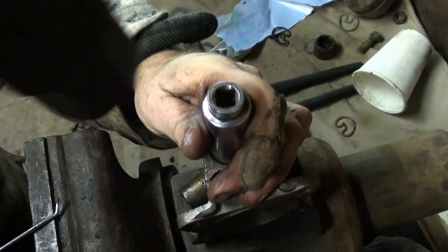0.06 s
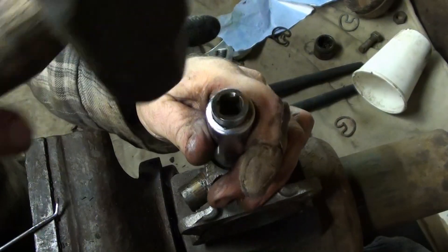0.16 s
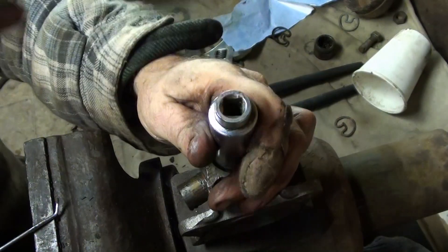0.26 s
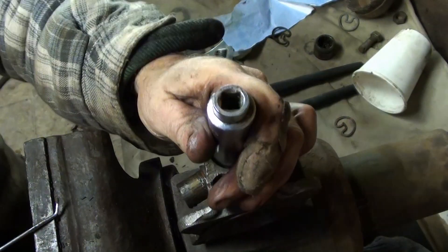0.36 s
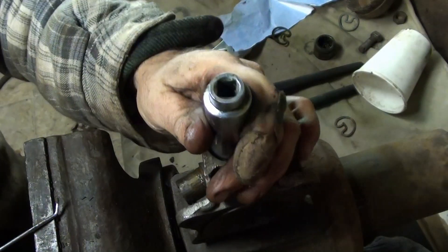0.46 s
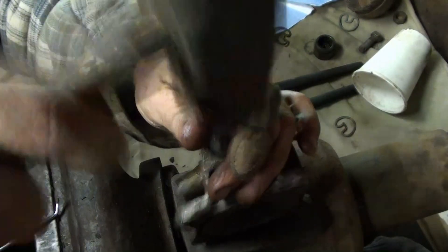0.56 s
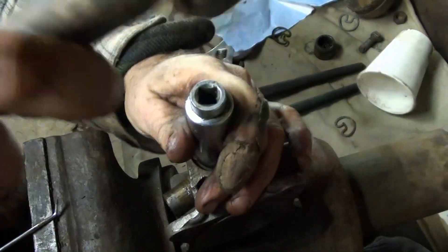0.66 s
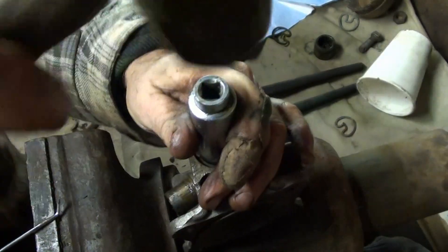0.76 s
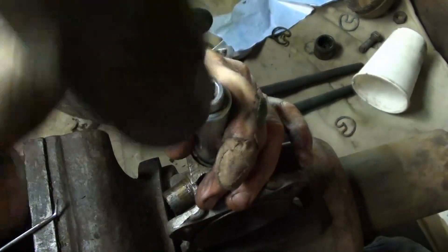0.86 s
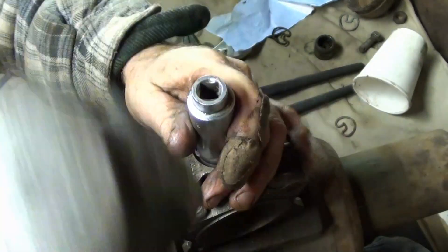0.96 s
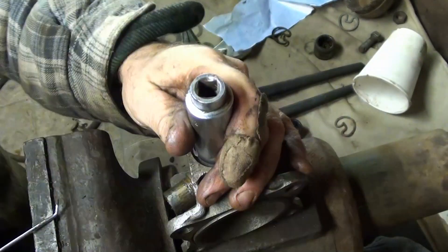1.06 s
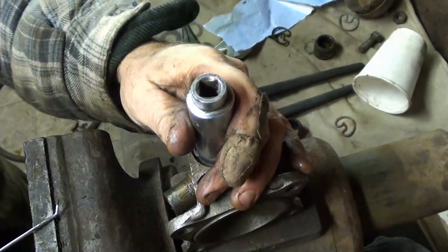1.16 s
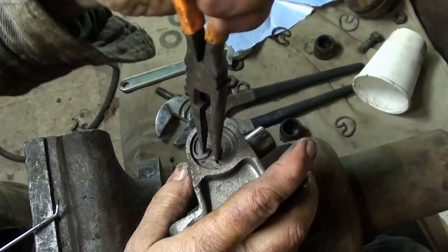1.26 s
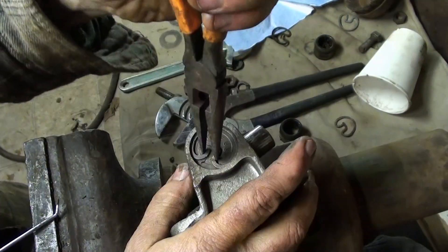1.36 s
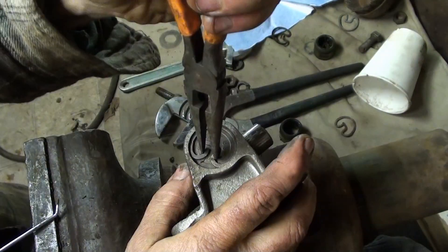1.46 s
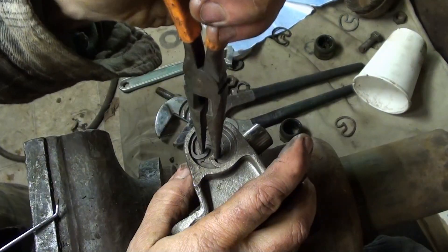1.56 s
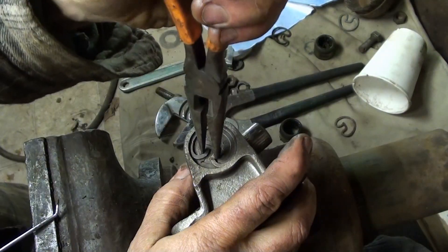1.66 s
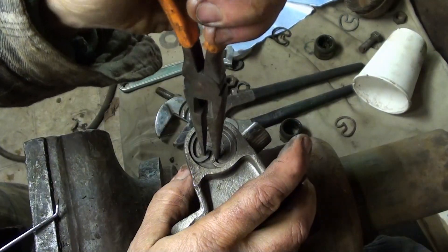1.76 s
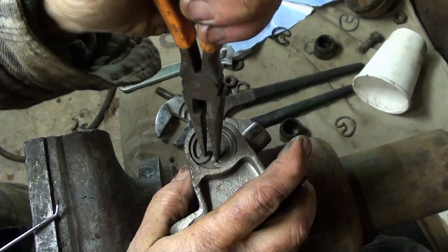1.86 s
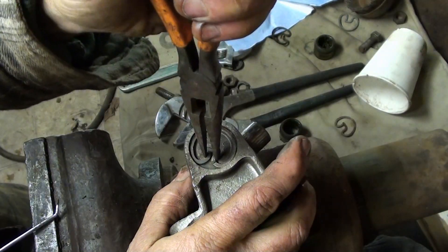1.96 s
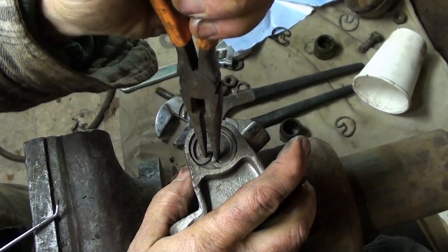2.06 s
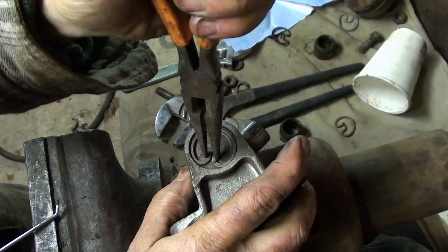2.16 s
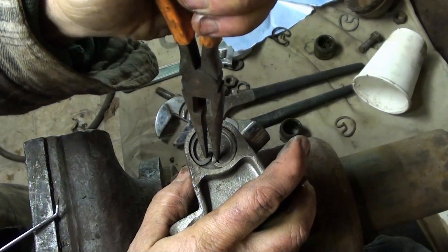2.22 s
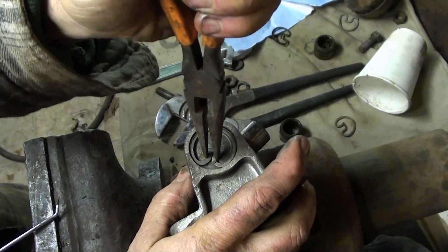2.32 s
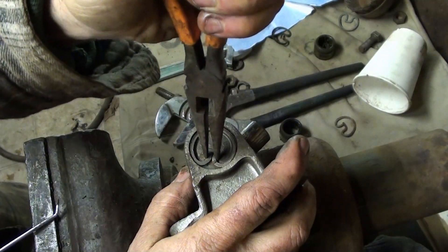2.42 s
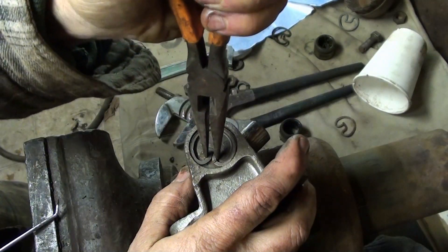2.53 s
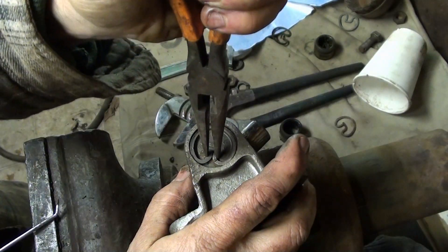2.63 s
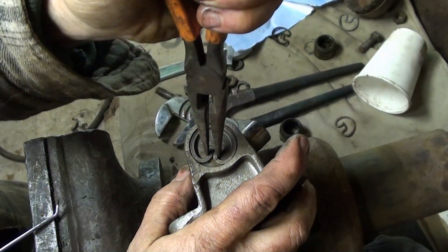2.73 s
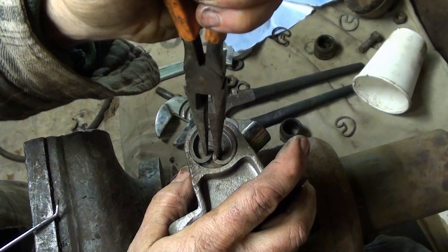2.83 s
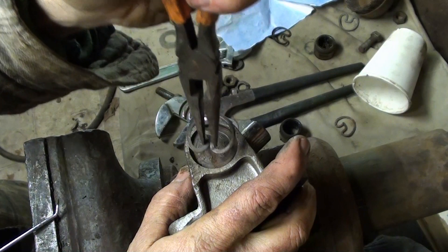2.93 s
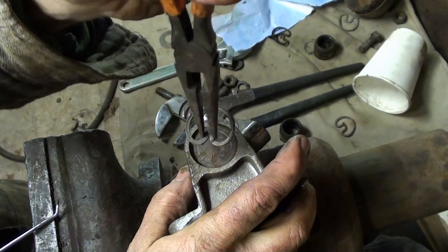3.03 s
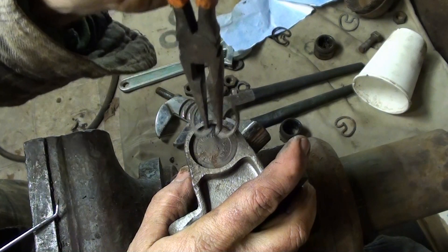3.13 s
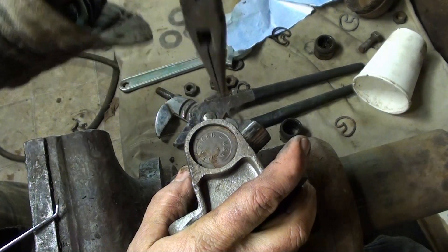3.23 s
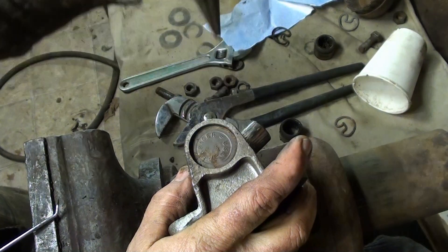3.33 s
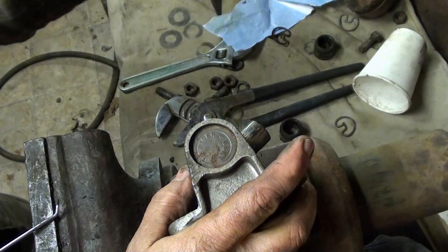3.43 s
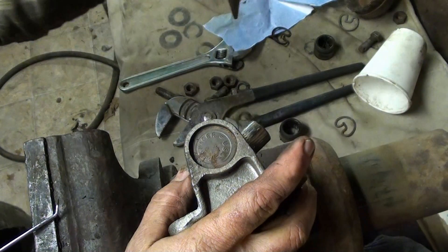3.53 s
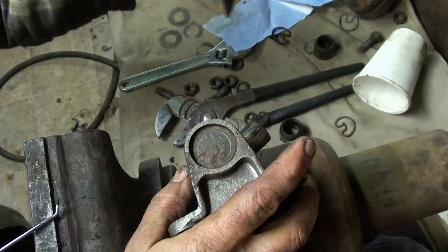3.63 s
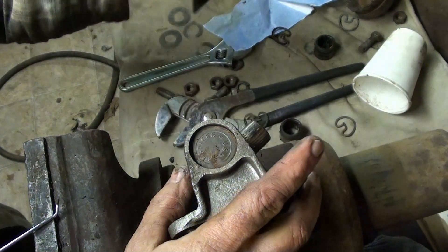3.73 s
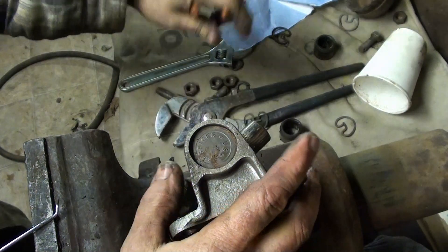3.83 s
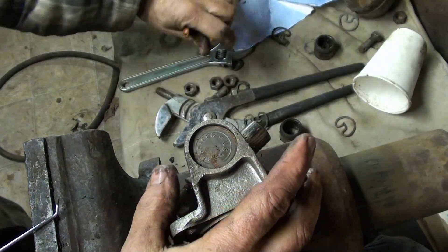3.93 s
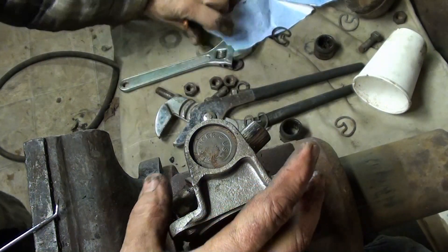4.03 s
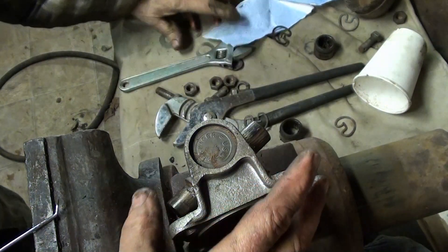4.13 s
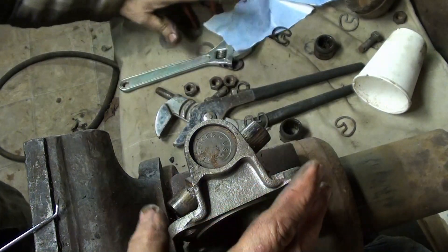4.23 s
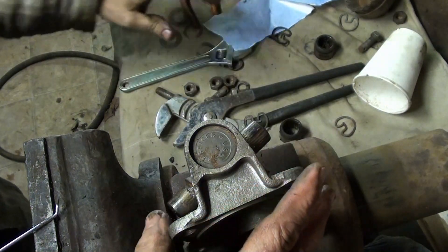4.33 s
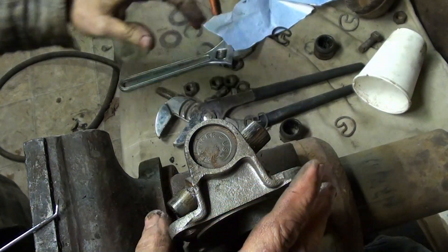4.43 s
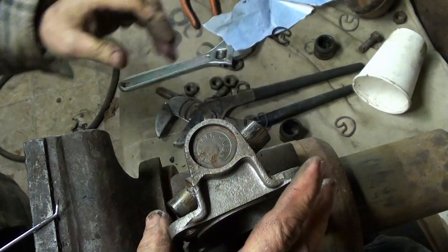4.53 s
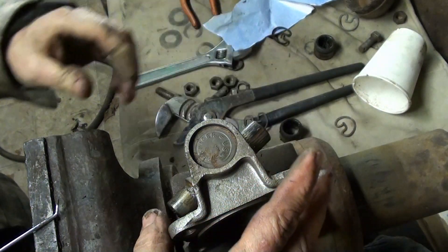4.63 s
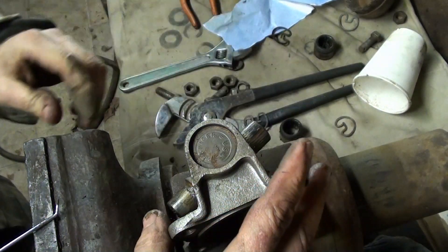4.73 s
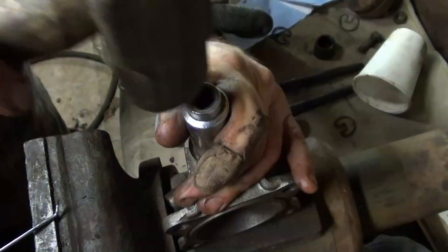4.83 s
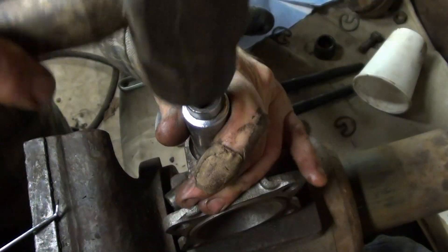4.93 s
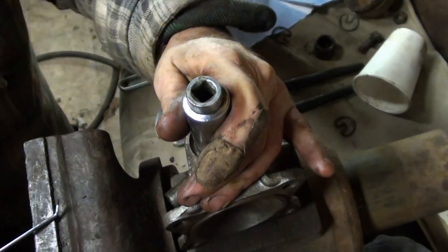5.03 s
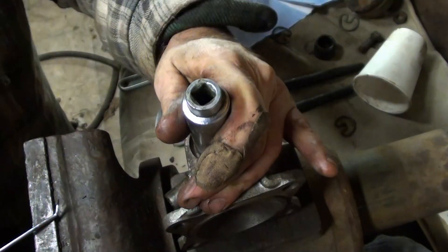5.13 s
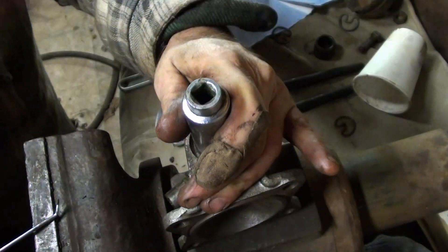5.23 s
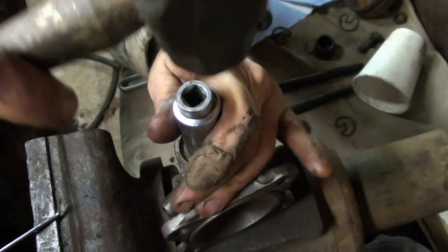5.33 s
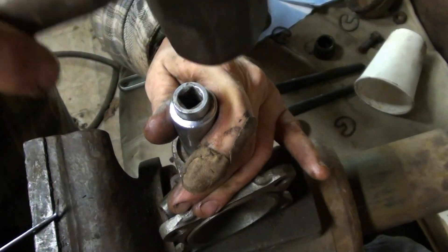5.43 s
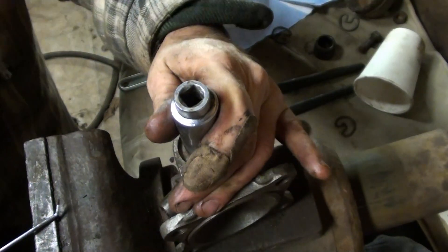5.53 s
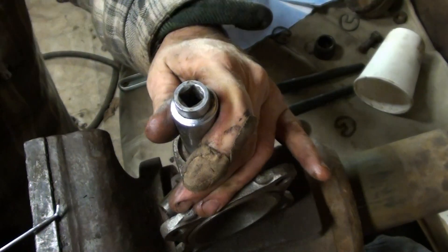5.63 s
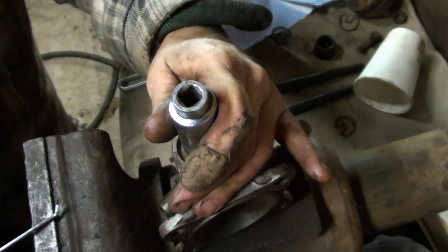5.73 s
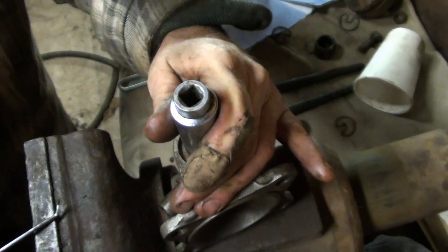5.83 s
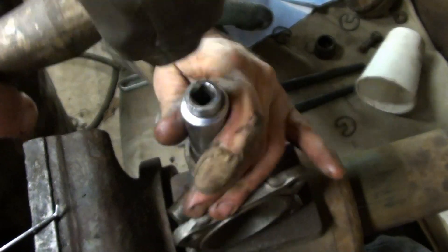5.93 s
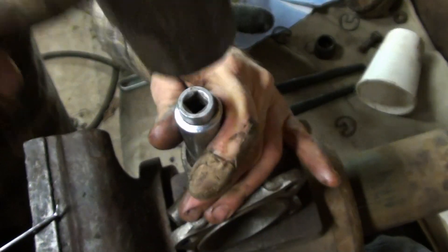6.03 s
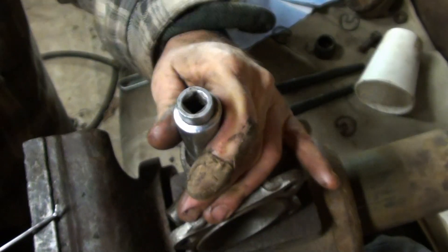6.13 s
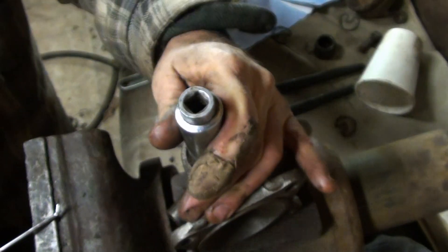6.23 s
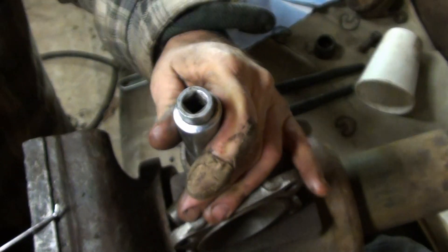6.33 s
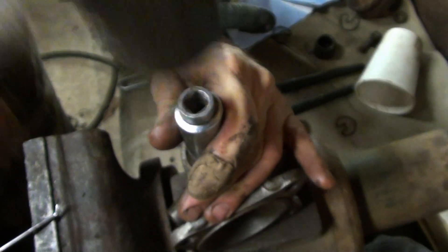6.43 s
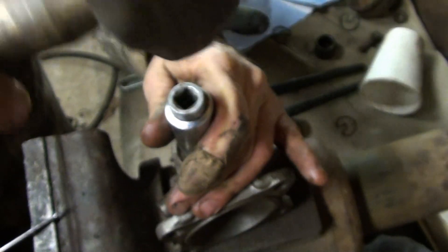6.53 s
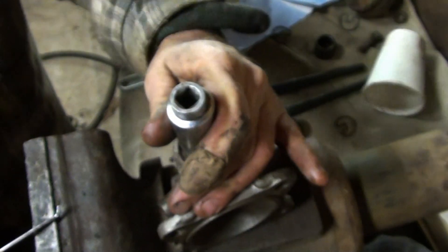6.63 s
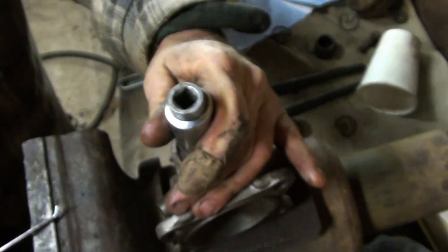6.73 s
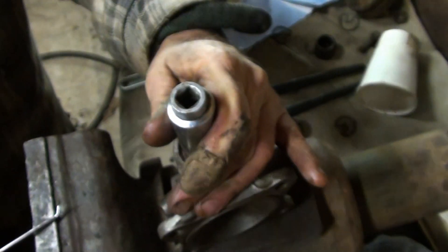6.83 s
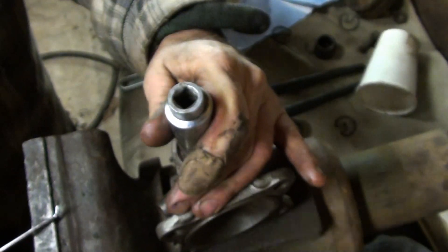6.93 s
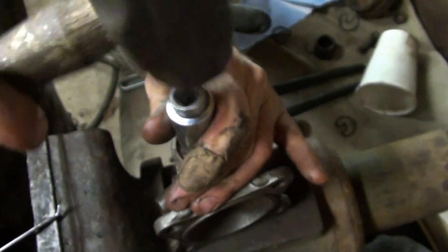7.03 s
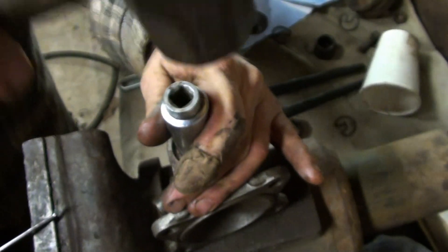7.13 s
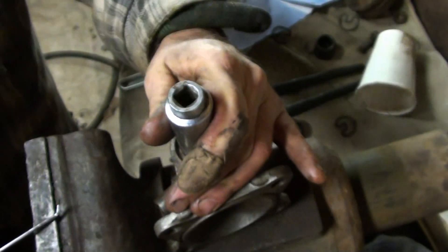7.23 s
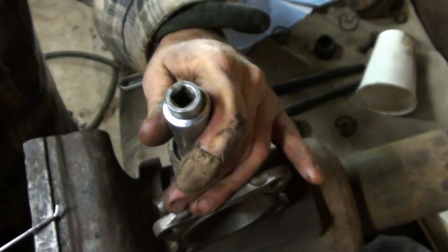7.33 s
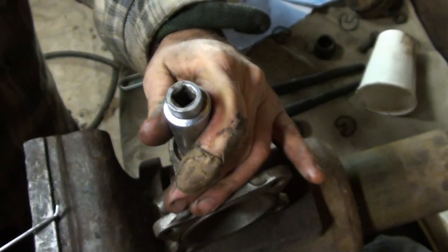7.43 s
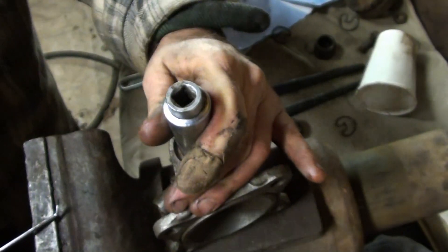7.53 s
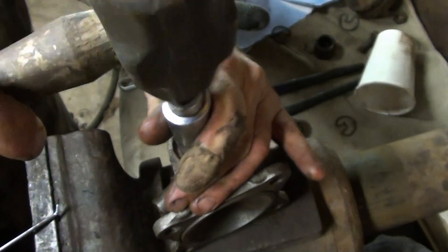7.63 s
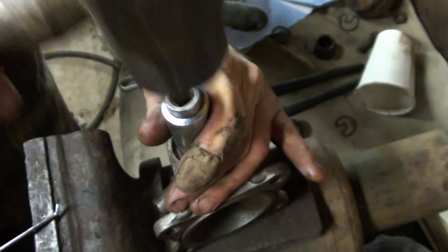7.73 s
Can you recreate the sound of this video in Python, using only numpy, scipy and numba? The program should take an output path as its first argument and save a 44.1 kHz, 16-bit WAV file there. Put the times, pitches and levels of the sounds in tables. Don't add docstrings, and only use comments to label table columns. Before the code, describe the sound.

Steel struck by a hammer at arm's length: a single loud clank, abruptly ended, then soft hand bumps and a small click. A light metal ring lands and bounces with bright tinkles, and pliers land in a quick cluster of clacks. Then five regular blows, roughly two every second, grow brighter and ring higher. Dry, faint room echo, steady hiss, distant bird chirps.

```python
import sys
import numpy as np
from scipy import signal
from scipy.fft import rfft, irfft
from scipy.io import wavfile
from scipy.ndimage import uniform_filter1d
from numba import njit

SR = 44100
rng = np.random.default_rng(int(sys.argv[2]) if len(sys.argv) > 2 else 0)


def waveform_to_disk(signal):
    frames = np.transpose(np.atleast_2d(signal))
    scaled = np.clip(frames, -1, 1) * 32767
    samples = np.round(scaled).astype(np.int16)
    wavfile.write(sys.argv[1], SR, samples)


def boost(x):
    u = np.asarray(x, float) / 20
    return 10 ** u


N = 342657
CUT_S = 1.285


def read(table, hz):
    f, v = np.transpose(table)
    return np.interp(np.log(np.maximum(hz, 1)), np.log(f), v)


def colour(x, gain_db):
    n = x.shape[-1]
    return irfft(rfft(x) * boost(gain_db(np.arange(n // 2 + 1) * SR / n)), n)


def add(out, s, x):
    i = int(s * SR)
    out[..., i:i + x.shape[-1]] += x[..., :max(N - i, 0)]


def dense(spectrum, t60s, rise_cycles=5.3, treble_db=0.):
    # hz, level_db
    width = [(60, -29), (110, -30.5), (200, -26), (380, -21), (700, -15), (1290, -11.5), (2380, -13),
             (4400, -12), (8120, -10.5), (15000, -24)]
    n = 2 ** 16
    t, hz = np.arange(n) / SR, np.arange(n // 2 + 1) * SR / n
    treble = np.clip(np.log2(hz / 1500 + 1e-9) / 2, 0, 1)
    mid_db = read(spectrum, hz) + treble_db * treble
    mid_side_db = mid_db + np.array([0 * hz, read(width, hz)])
    noise = rfft(rng.standard_normal((2, n))) * boost(mid_side_db)
    out = np.zeros((2, n))
    for centre in 40 * 2 ** np.arange(0, 9, .5):
        octaves_off = np.log2(np.maximum(hz, 1) / centre)
        share = np.cos(np.pi * np.clip(octaves_off, -.5, .5))
        swell = 1 - np.exp(-t * centre / rise_cycles)
        decay = boost(-60 * t / read(t60s, centre))
        out += irfft(noise * share, n) * swell * decay
    mid, side = out
    return np.array([mid + side, mid - side])


def ring(modes, tilt_db=0., stretch=0.96, rough=.5, flutter_hz=60., lasts=0.56):
    hz, db, t60 = np.transpose(modes)[:, :, None]
    level_chance, phase_chance = rng.standard_normal((2, len(modes), 1))
    knots = rng.standard_normal((2, len(modes), 200))
    t = np.arange(int(lasts * SR)) / SR
    flutter = np.array([np.interp(t * flutter_hz, np.arange(200), a + 1j * b) for a, b in zip(*knots)])
    looseness = (1 + rough * flutter) / np.sqrt(1 + rough ** 2)
    db = db + 1.2 * level_chance + tilt_db * np.log2(hz / 8000) - 60 * t / (t60 * stretch)
    partials = boost(db) * np.imag(looseness * np.exp(2j * np.pi * hz * t + 1j * phase_chance))
    return partials.sum(axis=0) * np.clip((lasts - t) / 0.00063, 0, 1)


def burst(hz, octaves, length):
    t = np.arange(int(SR * (3 * length + 8 / hz))) / SR
    rise, fall = np.minimum(t / (0.056 * length), 1), np.exp(-(t / length) ** 2)
    x = rng.standard_normal(len(t)) * rise * fall
    edges = np.clip(hz * 2 ** (np.array([-.5, .5]) * max(octaves, .1)), 30, .45 * SR)
    x = signal.sosfilt(signal.butter(2, edges, "band", fs=SR, output="sos"), x)
    return x / np.sqrt(np.sum(x ** 2) / (length * SR))


def hammer():
    # start_s, strength_db, bench_thud_db, treble_db (hardness), high_socket_rings_db
    blows = [(0.688, -4.5, 1, -1, -1), (5.411, -7, -1.5, 0, 1.5), (5.985, -4.5, -3, 0, 7.5),
             (6.569, -5, 2, 3, 2.5), (7.134, -5.5, 0.5, 3.5, 6), (7.689, -9.5, 10.5, 6.5, 8)]
    # hz, t60_s
    clamp = [(35, -42), (60, -10), (380, -4.5), (1140, -8.5), (1280, -1.5), (1410, -10), (1660, -7.5),
             (1820, -5), (2190, -6.5), (3700, -9), (4300, -13), (7400, -9), (10000, -16), (14900, -32),
             (16000, -56)]
    clamp_t60 = [(80, 0.31), (250, 0.31), (700, 0.35), (2000, 0.36), (5000, 0.35), (10000, 0.27),
                 (15000, 0.17)]
    # hz, t60_s
    bench = [(50, -35), (100, -9.5), (280, -5.5), (500, -8), (1000, -7.5), (2500, -15), (5000, -42)]
    bench_t60 = [(80, 1.33), (300, 1.094), (1000, 0.65), (3000, 0.76)]
    # hz, level_db, t60_s
    yoke = [(382.4, -10, 0.63), (1266, -5, 0.4), (1316, -1, 0.2), (1562, 2.5, 0.16), (1587, -4.5, 0.33),
            (1683, 0.5, 0.36), (1953, -4.5, .3), (2100, -11, 0.15), (2240, -4, 0.4), (2746, -1.5, 0.34),
            (2970, -1.5, 0.23), (3320, -15.5, 0.22), (3420, -1, .28), (3700, -2, 0.357)]
    socket_low = [(6710, 5.5, 0.17), (6920, -2.5, 0.39), (7370, 3, 0.21), (7700, 8, 0.2),
                  (8110, -2.5, 0.18), (8200, -19.5, .17)]
    socket_high = [(9800, -17, 0.16), (9760, 7.5, 0.045), (9820, -2, 0.14), (10080, -6.5, 0.19),
                   (10700, -19.5, 0.15), (14800, -19.5, .1)]
    bench_note = [(281.7, -1.3, 1.37)]
    head_note = [(5669, 0, .37)]
    # hz, level_db, t60_s
    seatings = [
        [(1260, 3, 0.4), (2210, 0.5, .3), (7300, -2, .33)],
        [(2390, 4, 0.33), (9690, 1, 0.28), (9824, -6, .13)],
        [(6670, 1, 0.34), (14900, -8, 0.12), (9750, 6, 0.27)],
        [(9458, 10, 0.21), (15000, -4, 0.2)],
        [(7490, 7, 0.37), (7230, 2, .2), (7620, 9.5, 0.26), (14950, -2, 0.15)],
        [(6500, -6, .25), (9800, 6, 0.31), (14950, -4.5, 0.19)],
    ]
    head_levels = [-40, -28, -20, -13, -20, -19]
    socket_rattle = dict(rough=1.9, flutter_hz=150.)
    out = np.zeros((2, N))
    for (s, db, thud_db, treble_db, high_db), seating, head_db in zip(blows, seatings, head_levels):
        x = boost(7.5) * dense(clamp, clamp_t60, treble_db=treble_db)
        x += boost(-8.0 + thud_db) * dense(bench, bench_t60)
        steel = boost(-17) * ring(yoke, rough=0.67, flutter_hz=36.3)
        low_db = -19.5 + 1.95 * treble_db
        steel += boost(low_db) * ring(socket_low, **socket_rattle)
        steel += boost(-14.5 + high_db) * ring(socket_high, **socket_rattle)
        steel += boost(-17.5) * ring(seating, rough=.8, flutter_hz=60.)
        steel += boost(head_db) * ring(head_note, rough=.35, flutter_hz=25.)
        x[:, :len(steel)] += steel
        add(x, 0, boost(-36.0 + thud_db) * ring(bench_note, rough=0.45, flutter_hz=16.1, lasts=1.))
        t = np.arange(x.shape[1]) / SR
        x *= np.minimum(t / .003, 1) ** 2
        if s < CUT_S:
            x *= np.clip((CUT_S - s - t) / 0.011, 0, 1)
        add(out, s - .0015, boost(db + 5) * x)
    return out


def contacts(table, modes, crack_hz, until, **looseness):
    out = np.zeros((3, N))
    ends = [row[0] for row in table[1:]] + [until]
    for (s, db, ring_db, tilt_db, thud_db), end in zip(table, ends):
        add(out[0], s, boost(db - 4.5) * burst(crack_hz, 1.29, 0.002))
        add(out[1], s, boost(db + ring_db) * ring(modes, tilt_db, lasts=end - s, **looseness))
        add(out[2], s, boost(db + thud_db) * np.hanning(14) * 2)
    return out


def bench_work():
    # start_s, peak_db, ring_db, ring_tilt_db_per_octave, bench_thud_db
    ring_lands = [
        (3.3266, -19.5, -7, -.4, -29),
    ]
    ring_bounces = [
        (3.4705, -19.5, -5, -5, -20),
        (3.5788, -29, -2, 6, -25.5),
        (3.6454, -36, -4, -4, -23),
        (3.654, -38, -3, -11, -35),
    ]
    pliers_down = [
        (4.1835, -11.5, -4.5, 0, -4),
        (4.1914, -15, -2, -3, -11.5),
        (4.2015, -13, -9, 15, -12),
        (4.2422, -8, -6.5, -2, -6.5),
    ]
    # hz, level_db, t60_s
    ring_flat = [(1137, -26, 0.61), (2090, -7.5, 0.15), (2270, -12, 0.18), (4150, -3, 0.086),
                 (4420, -6, 0.15), (5000, -11, 0.17), (6630, -3.5, 0.16), (6970, -2.5, 0.12),
                 (7170, -5, 0.16), (8050, -12, .12), (8070, -9, .12), (8640, -14.5, .3), (10250, -11, .18)]
    ring_free = [(6290, -5.5, 0.42), (6304, -11, 0.49), (7850, -5.5, 0.13), (7850, -10, 0.27),
                 (8700, -9, 0.29), (8670, -11, 0.3), (9900, -24, .3), (12590, -6, .22), (12615, -1, 0.24),
                 (14980, -15.5, 0.27), (15005, -11, 0.35)]
    pliers = [(1270, -15.5, 0.1), (4770, -14, .2), (5060, -17, 0.11), (5120, -17, .15), (6360, -12, 0.066),
              (8140, -8.5, 0.14), (8441, -20, 0.15), (10100, 0.5, 0.073), (10300, -14, 0.22),
              (10450, -14, .18), (10300, -7.5, 0.11), (10300, -21, 0.36)]
    # hz, t60_s
    table_top = [(60, -18), (120, -12), (285, -1.5), (400, -1), (700, -7), (1500, -10), (3000, -11),
                 (6000, -12)]
    table_top_t60 = [(80, 0.76), (300, 0.45), (1000, 0.42), (3000, 0.21)]
    landing = contacts(ring_lands, ring_flat, 5750, 3.47, stretch=1.16, rough=2.1, flutter_hz=386.0)
    bouncing = contacts(ring_bounces, ring_free, 5630, 3.76, stretch=0.8, rough=0.12, flutter_hz=30.)
    laying = contacts(pliers_down, pliers, 6200, 4.6, stretch=0.81, rough=0.98, flutter_hz=161.0)
    cracks, rings, pushes = landing + bouncing + laying
    top = dense(table_top, table_top_t60, rise_cycles=0.63)
    boom = boost(-12.5) * signal.fftconvolve(pushes[None], top, axes=1)[:, :N]
    return cracks, rings, boom


def hands():
    # start_s, rms_db, length_s
    rustles = [(0.938, -50.5, 0.018), (1.016, -57, .03), (1.116, -54, 0.018), (1.213, -58, .015),
               (1.29, -63, .045), (4.772, -60, 0.083), (6.795, -43.5, 0.033), (6.908, -56.5, 0.02)]
    # start_s, rms_db, centre_hz, width_octaves
    ticks = [(1.8522, -32.5, 7330, 0.15), (1.856, -37, 6500, 0.54), (1.86, -53, 6500, .7),
             (3.451, -33.5, 1177, 0.23), (3.454, -40, 4970, 1.1), (3.574, -45, 4000, 2.3),
             (3.646, -45, 1620, 1.1), (3.759, -49.5, 4950, 1.9), (3.843, -53, 3100, 0.45),
             (4.357, -33, 2920, 0.87), (4.261, -27, 9000, .8), (4.252, -30, 5000, 0.11),
             (5.407, -24, 2780, 1.3)]
    # start_s, rms_db, centre_hz, length_s
    bumps = [(1.038, -53, 1750, 0.025), (1.142, -59.5, 870, 0.089), (1.66, -56, 410, 0.03),
             (1.86, -62, 600, .018), (3.454, -38.5, 1900, .012), (3.469, -37, 1490, 0.014),
             (3.499, -66, 430, 0.25), (4.232, -29.5, 1500, .01), (4.90, -56, 513, 0.016),
             (4.92, -62.5, 203, 0.021), (5.75, -58, 720, 0.03), (6.451, -59.5, 1900, .025),
             (6.461, -56, 590, .03), (6.501, -56, 750, .02), (6.80, -54, 2530, .04),
             (6.908, -57, 2200, 0.022), (7.60, -58, 580, 0.053), (7.62, -58, 1890, .024),
             (7.62, -60, 3600, .023)]
    out = np.zeros(N)
    for s, db, length in rustles:
        add(out, s, boost(db) * burst(5670, 0.99, length))
    for s, db, hz, octaves in ticks:
        add(out, s, boost(db) * burst(hz, octaves, 0.0017 + 6.2 / hz))
    for s, db, hz, length in bumps:
        add(out, s, boost(db) * burst(hz, 1.14, length))
    return out


def bird():
    # start_s, length_s, rms_db, pitch_hz, droop_hz_per_s
    calls = [(.43, 0.053, -62, 4830, 1200), (1.577, .08, -66, 4500, 1500), (1.748, 0.078, -62, 4500, 700),
             (1.905, .05, -59, 4520, 3000), (2.052, 0.12, -59, 4390, 400), (2.69, .08, -66, 4130, 1010),
             (2.833, .09, -64.5, 4490, 1200), (3.052, 0.089, -63, 4540, 1500),
             (3.26, 0.069, -63, 4380, 1500), (4.552, 0.14, -60, 4440, 1500), (4.787, 0.11, -58, 4380, 1100),
             (6.472, 0.11, -58.5, 4650, 5600)]
    scoop_hz, scoop_s = 300, 0.0066
    attack_s, release_s = .015, 0.026
    out = np.zeros(N)
    for s, length, db, hz, droop in calls:
        t = np.arange(int(length * SR)) / SR
        wobble = uniform_filter1d(rng.standard_normal(SR // 4), size=150)[:len(t)]
        pitch = hz * (1 + .085 * wobble) - scoop_hz * np.exp(-t / scoop_s) - droop * t
        fade = np.clip(np.minimum(t / attack_s, (length - t) / release_s), 0, 1)
        whistle = np.sin(2 * np.pi * np.cumsum(pitch) / SR)
        add(out, s, np.sqrt(2) * boost(db) * fade * whistle)
    return out


def workshop(sent):
    # hz, t60_s
    room = [(60, -12), (200, 7), (1000, 0.5), (5000, 1), (10000, -2), (16000, 0)]
    room_t60 = [(100, 0.79), (400, 0.18), (2000, 0.38), (8000, 0.27), (15000, 0.22)]
    walls = dense(room, room_t60, rise_cycles=1.1)
    return signal.fftconvolve(sent[None], walls, axes=1)[:, :N]


def capsule(air):
    # hz, level_db
    mic_top = [(9000, -1), (11000, 1), (13000, -12.5), (16000, -1.5)]
    air = signal.sosfilt(signal.butter(2, 89.3, "high", fs=SR, output="sos"), air)
    gain = boost(2 * read(mic_top, np.linspace(0, SR / 2, 65)))
    taps = signal.minimum_phase(signal.firwin2(127, np.linspace(0, 1, 65), gain))
    return signal.lfilter(taps, 1, air)


def hiss():
    # hz, level_db
    floor = [(15, -44), (25, -13.5), (108, 1), (309, 1), (427, 0.5), (516, 0), (641, -2.5), (754, -1),
             (3080, -5.5), (8590, -6), (9320, -8), (14800, -8), (15850, -11.5), (16050, -35)]
    # hz, level_db
    floor_width = [(60, -9), (110, -16), (200, -6.5), (380, -2), (700, 0.5), (1290, 0), (2380, -3),
                   (4400, -7.5), (8120, -11.5), (15000, -16)]
    # pitch_hz, rms_db
    whine = [(8393, -83.5), (8629, -86)]
    mid = colour(rng.standard_normal(N), lambda hz: read(floor, hz))
    side = colour(rng.standard_normal(N), lambda hz: read(floor, hz) + read(floor_width, hz))
    t = np.arange(N) / SR
    tones = sum(np.sqrt(2) * boost(db) * np.sin(2 * np.pi * hz * t) for hz, db in whine)
    whirr = burst(3500, .12, 15.0)[:int(CUT_S * SR)]
    add(tones, 0, boost(-73.5) * whirr / np.std(whirr))
    return np.array([mid + side, mid - side]) * boost(-59.5) / np.std(mid) + tones


def scene():
    cracks, rings, boom = bench_work()
    knocks = cracks + hands()
    far = bird()
    wet = workshop(knocks + boost(-4.0) * rings + boost(-6.0) * far)
    air = hammer() + knocks + rings + boom + boost(-4.5) * far + boost(-35) * wet
    return capsule(air) + hiss()


@njit
def follow(x, attack, release):
    e, out = 0., np.empty(len(x))
    for i in range(len(x)):
        e += (x[i] - e) * (attack if x[i] > e else release)
        out[i] = e
    return out


def top_cut(x):
    return signal.sosfilt(signal.butter(12, 16480, fs=SR, output="sos"), x)


def record(dry):
    attack_s, release_s, ceiling_db = 0.00057, 0.0055, -11.5
    level = follow(np.abs(dry).max(axis=0), 1 / (attack_s * SR), 1 / (release_s * SR))
    level = np.append(level[40:], level[-40:])
    held = dry * np.minimum(boost(ceiling_db) / (level + 1e-9), 1) ** 0.85
    return top_cut(held)


dry = scene()
out = record(dry)
waveform_to_disk(out)
```